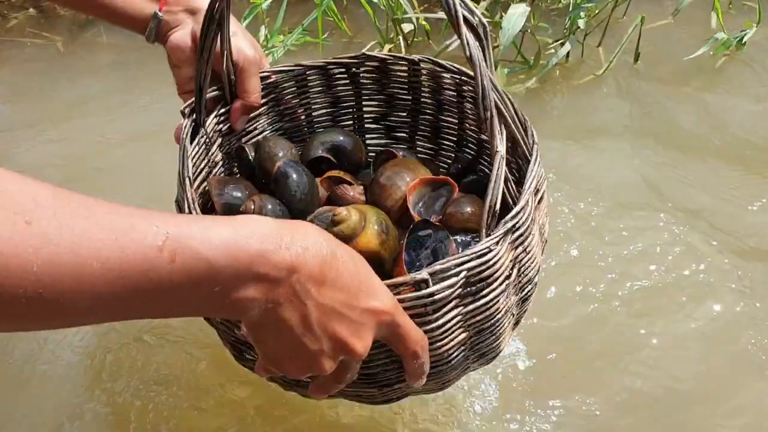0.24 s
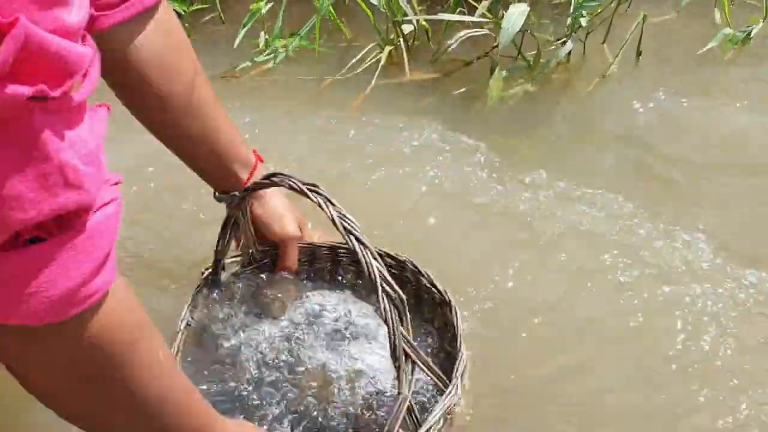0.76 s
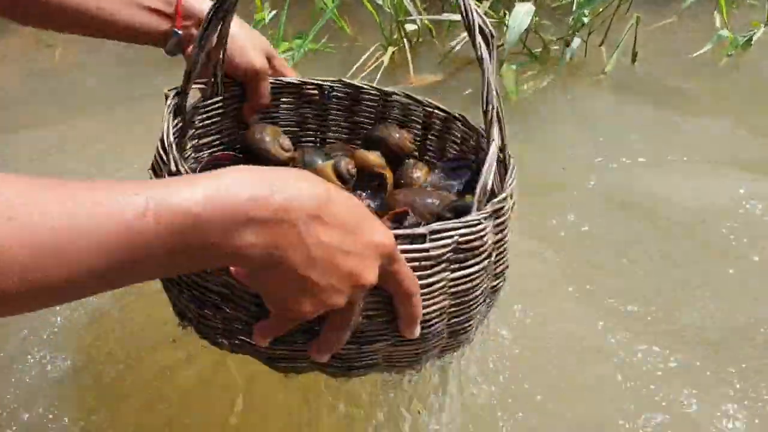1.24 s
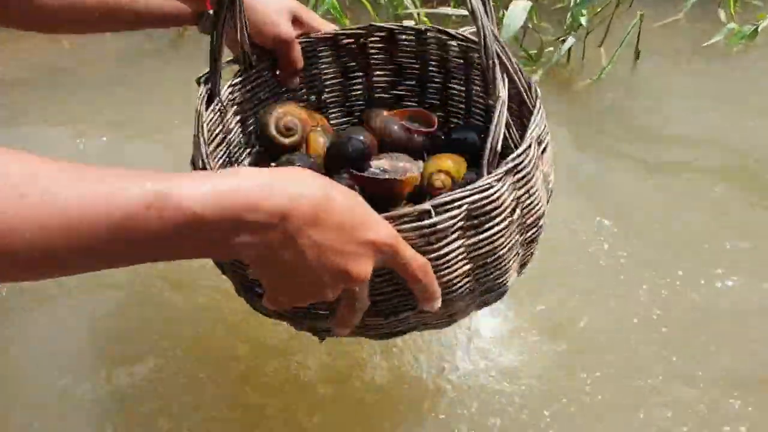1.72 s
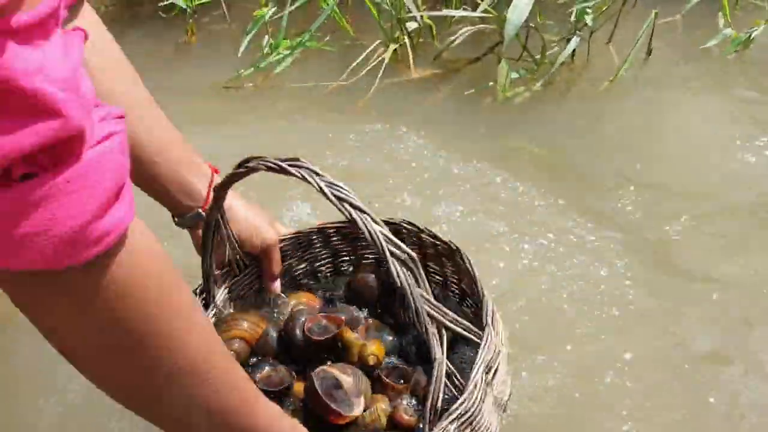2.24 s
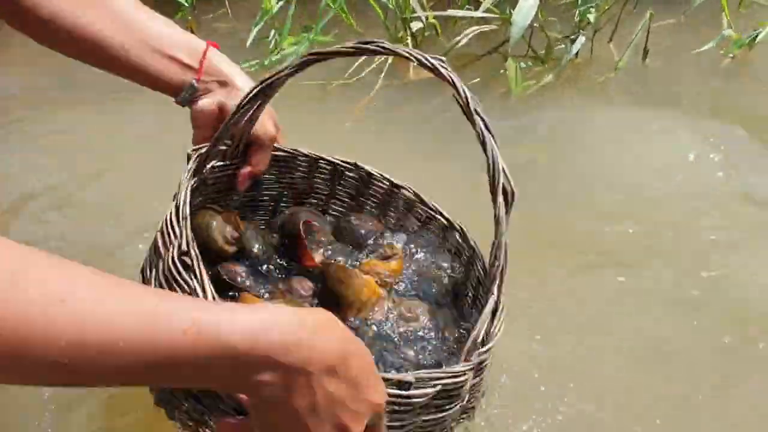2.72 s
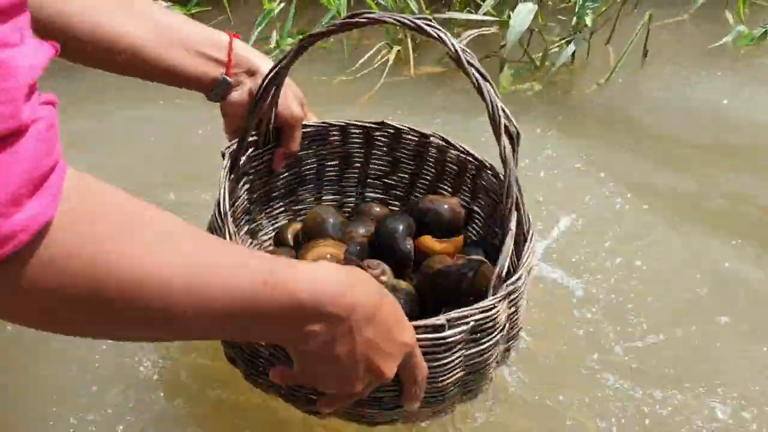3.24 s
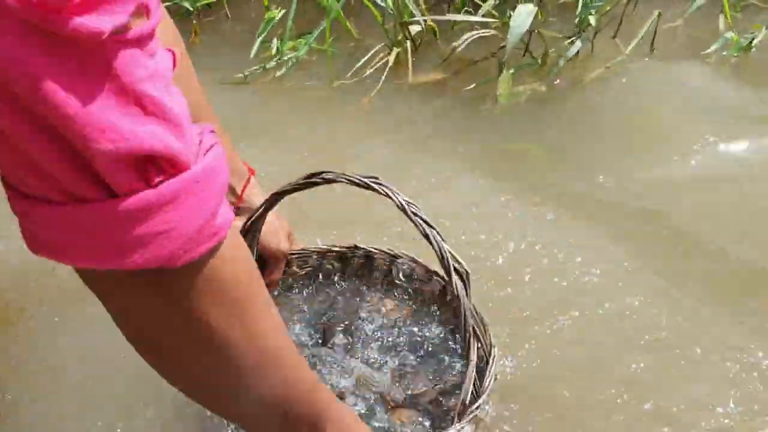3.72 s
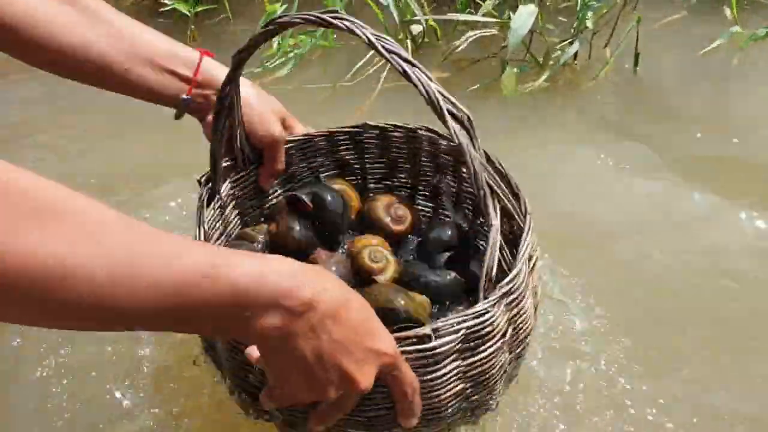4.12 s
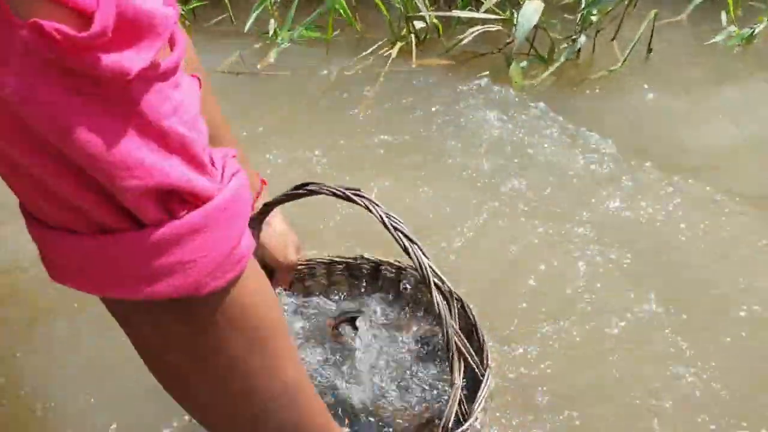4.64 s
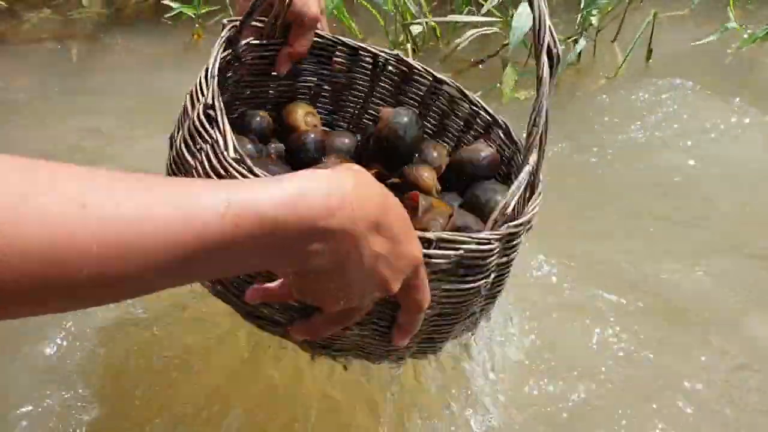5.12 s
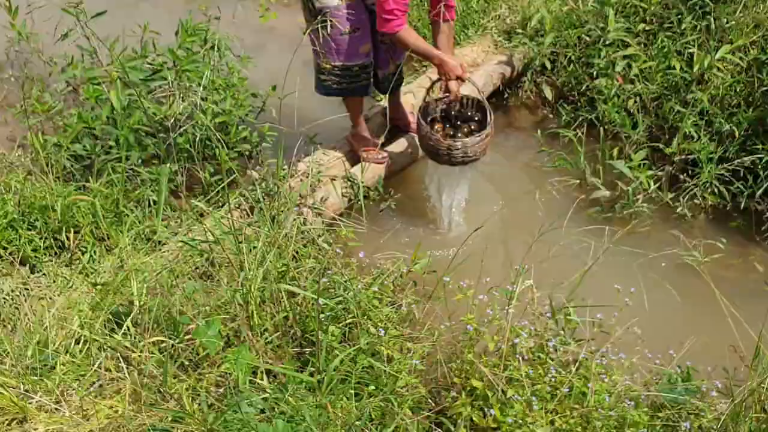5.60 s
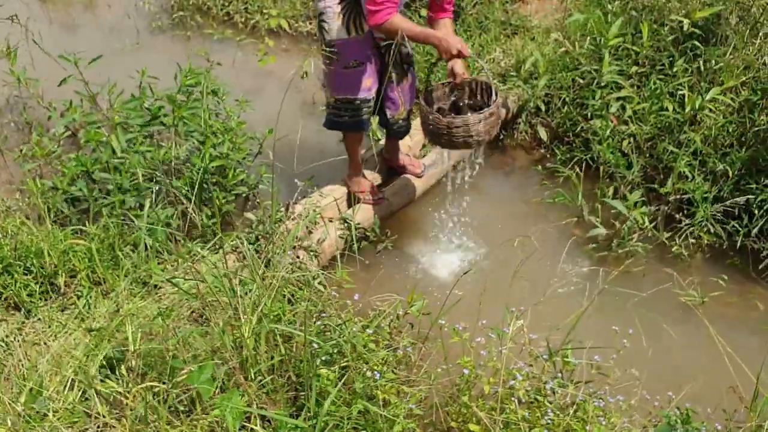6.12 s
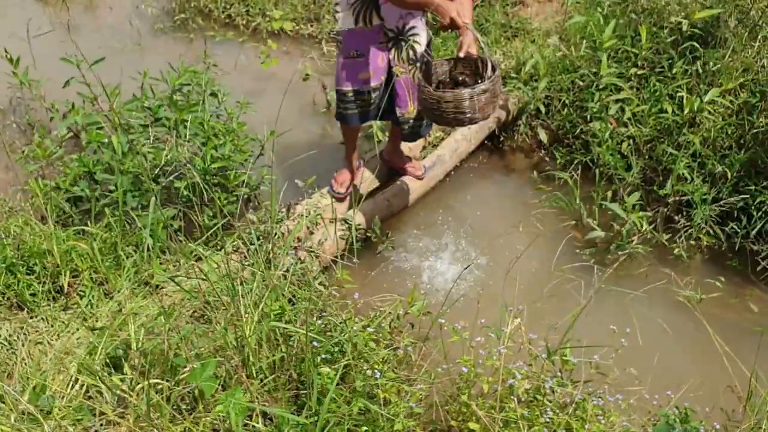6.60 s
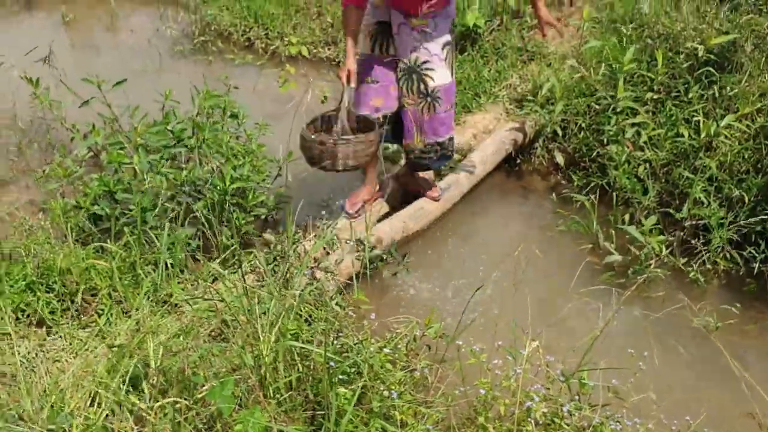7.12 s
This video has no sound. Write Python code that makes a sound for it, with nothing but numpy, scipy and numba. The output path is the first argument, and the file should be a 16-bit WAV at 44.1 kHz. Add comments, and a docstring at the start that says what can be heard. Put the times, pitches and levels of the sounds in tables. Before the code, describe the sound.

Close, dry outdoor stereo of a wicker basket of snails being rinsed in a shallow stream. From 0 to 0.35 s heavy splashes land in quick wet slaps with bubbly wash and spray. The flow drops to a thin trickle with tiny clicks, then submerged gurgles at about 0.8 and 1.05 s. At 1.6 s another strong double splash, with a bright plop, and a sharper slap around 2.0 s. A crisp shell clack at 2.2 s, soft low bubbling to 2.9 s, then rounder sloshing from 3.0 to 3.5 s. Gentler swishes, plops and clacks continue, swelling around 4.0 to 4.4 s, and quieten by 5.4 s. At 5.7 s a loud, hissy pour hits the water; smaller splashes at 6.0 and 6.3 s break into drips, fading to near silence with faint clicks after 6.8 s. Light wind rumbles and a barely audible stream lie beneath.

```python
"""A wicker basket of snails splashes in a shallow stream, is dunked and lifted again, then drains in drips.
Splashes and flow are swarms of decaying sines over filtered noise: bubbles, drops and spray, set by level curves.
Slaps and plops are single damped resonances with noise bursts, and clicks of shells and wicker
a few short modes with a crack, all at listed times.
Throughout, filtered noise gives a faint stream and a light breeze that gusts on the microphone."""
import sys
import numpy as np
from scipy import signal
from scipy.fft import rfft, irfft, next_fast_len
from scipy.io import wavfile
from scipy.ndimage import uniform_filter1d
from numba import njit

SR = 44100
rng = np.random.default_rng(int(sys.argv[2]) if len(sys.argv) > 2 else 0)


def store_wav(level_fs):
    """Save 16-bit WAV to argv[1]."""
    pcm = np.round(np.clip(np.atleast_2d(level_fs), -1, 1) * 32767)
    wavfile.write(sys.argv[1], SR, pcm.T.astype(np.int16))


N = 324557
TIME = np.arange(N) / SR   # seconds

# Table levels are relative; each source adds its own trim.
# water thrown up or pouring out of the basket: crest_s, bubbles_db, swell_s, ebb_s,
# drops_over_bubbles_db, spray_over_drops_db
SPLASHES = [(0.023, -30, 0.05, 0.018, 7, -0.5), (0.087, -18, 0.081, 0.13, 6, -5),
            (0.121, -16, 0.055, 0.07, -19, -3), (0.216, -17.5, 0.11, 0.055, -1.5, -2.5),
            (0.28, -31.5, 0.08, 0.088, -0.5, -3), (0.395, -33, 0.25, 0.074, 2, -3.5),
            (0.889, -38, 0.014, 0.043, -19.5, 10.5), (1.081, -32, 0.04, 0.06, -16, -5),
            (1.531, -34.5, 0.039, 0.027, 4.5, 0.5), (1.627, -18.5, 0.063, 0.16, 2.5, -2),
            (1.682, -17.5, 0.13, 0.074, -4, -5.5), (1.906, -49.5, 0.034, 0.05, 19, -10),
            (1.967, -20, 0.029, 0.11, 2.5, -1), (2.028, -29.5, 0.04, 0.24, 2.5, -0.5),
            (2.74, -32.5, 0.033, 0.075, -17.5, -5), (3.024, -26, 0.17, 0.14, -0.5, -9),
            (3.149, -27.5, 0.039, 0.53, -3, -5), (3.26, -23.5, 0.24, 0.17, 1, -1.5),
            (3.426, -25, 0.22, 0.048, -1.5, -5), (3.512, -37, 0.03, 0.025, 4, -10.5),
            (3.603, -36.5, 0.096, 0.12, 0, -2.5), (4.128, -25, 0.28, 0.18, -6.5, -9.5),
            (4.265, -25.5, 0.18, 0.089, 1.5, -11.5), (4.621, -35, 0.036, 0.077, -4, 0),
            (5.18, -49, 0.29, 0.26, -4, 6), (5.6, -34.5, 0.19, 0.15, 3, 1),
            (5.664, -25.5, 0.072, 0.12, 3.5, 5), (5.697, -14.5, 0.05, 0.099, -0.5, -3.5),
            (5.784, -27, 0.088, 0.031, 3, -6.5), (5.921, -36.5, 0.1, 0.25, 6, -7),
            (6.026, -28.5, 0.02, 0.0096, 4.5, 0.5), (6.325, -27, 0.0069, 0.097, 8, -5),
            (6.376, -40, 0.033, 0.044, 14, -2.5), (6.445, -52, 0.04, 0.08, 18.5, -7.5),
            (6.535, -34, 0.092, 0.06, 10, -4.5)]
# steady flow through the weave between the splashes: time_s, level_db
FLOW = [(0.0, -29), (0.45, -44), (0.66, -46), (0.75, -43.5), (0.84, -51.5), (0.93, -43), (1.1, -44.5),
        (1.3, -50.5), (1.47, -45.5), (1.87, -58), (2.2, -48), (2.53, -43), (2.83, -41), (2.93, -33.5),
        (3.85, -44.5), (4.38, -34.5), (4.88, -47.5), (5.08, -38.5), (5.42, -51), (5.98, -42), (6.29, -48),
        (6.68, -46.5), (7.02, -55.5), (7.12, -67.5), (7.23, -54)]
# the basket goes under: deepest_s, half_length_s, depth (0-1)
DUNKS = [(0.835, 0.084, 0.46), (1.034, 0.08, 1.0), (2.584, 0.29, 0.61), (3.82, 0.22, 0.57),
         (4.797, 0.38, 0.39)]
# sheets of water hitting the stream: start_s, level_db, cavity_pitch_hz, t60_s
SLAPS = [(0.05, -19, 2260, 0.064), (0.078, -1, 1110, 0.059), (0.116, 0, 1086, 0.054),
         (0.206, -3.5, 1180, 0.076), (1.589, 1.5, 2140, 0.04), (1.609, -3.5, 1160, 0.12),
         (1.943, -6.5, 1570, 0.035), (1.961, -16, 1900, 0.07), (1.996, -6, 2190, 0.16),
         (2.022, 1.5, 1027, 0.048), (3.012, -11, 1225, 0.1), (3.262, -4.5, 615, 0.09),
         (5.595, -7.5, 2380, 0.13), (5.66, 4, 2602, 0.091), (5.69, -1.5, 1040, 0.06),
         (6.018, -7, 934, 0.055), (6.32, -9, 1340, 0.053)]
# single large bubbles: start_s, level_db, pitch_hz
PLOPS = [(0.88, -29, 1120), (1.032, -31, 610), (1.05, -26, 644), (1.076, -24, 625), (1.566, -20, 2190),
         (1.586, -5.5, 2220), (1.768, -15.5, 2100), (2.415, -27.5, 1210), (2.479, -31.5, 517),
         (2.626, -28.5, 1250), (2.733, -29, 1130), (2.767, -23, 1090), (2.866, -19.5, 1025),
         (3.501, -22.5, 1070), (3.558, -23, 1130), (3.994, -14.5, 1360), (4.007, -18, 1100),
         (4.544, -25.5, 628), (4.666, -25, 281), (4.707, -28, 1180), (5.017, -26, 1090)]
# shells knocking together and wicker snapping: start_s, level_db, pitch_hz
CLACKS = [(0.54, -24.5, 11500), (0.564, -31, 7000), (0.67, -35, 12000), (0.7126, -24.5, 4080),
          (1.2052, -27.5, 1260), (1.8121, -27.5, 1520), (2.148, -25.5, 1640), (2.174, -12.5, 6400),
          (2.274, -30.5, 2900), (2.8654, -36, 1220), (2.9874, -18.5, 3070), (3.0125, -19.5, 2920),
          (3.503, -35, 1810), (3.5599, -23.5, 1310), (3.6406, -29.5, 2360), (3.7192, -32, 1180),
          (3.992, -38, 1390), (4.4578, -16.5, 2960), (4.581, -22, 2700), (4.968, -31, 1140),
          (5.065, -29, 1920), (6.2687, -34, 2120), (6.8322, -43, 1580), (6.8824, -39, 2350),
          (6.9, -34, 2800), (7.2048, -38.5, 3800), (7.243, -37, 5630), (7.297, -42, 2160)]
# modes of one clack: multiple_of_pitch (ratio), level_db
CLACK_MODES = [(1, 5), (1.17, -4), (1.9, -5.5)]
# filter responses of the water sounds, of the stream and of the other sources: frequency_hz, gain_db
BUBBLE_COLOUR = [(60, -53), (140, -11.5), (320, -13), (420, -3.5), (560, 0.5), (830, -1), (1170, 4),
                 (1500, -2), (2000, -5.5), (3500, -47)]
DROP_COLOUR = [(200, -46), (900, -18), (1400, -3), (1750, -.5), (2200, .5), (2900, -4), (3800, -11),
               (5000, -15), (9000, -48)]
SPRAY_COLOUR = [(800, -50.5), (2800, 2.5), (4100, 0), (5200, -1), (6700, -1.5), (7500, -4.5), (8500, -11),
                (10700, -8), (13500, -9), (16000, -12.5)]
SLAP_COLOUR = [(47, -42), (80, -45.5), (346, -31), (538, -27), (839, -2), (1090, -44), (2080, -11),
               (2900, 2), (4620, -16), (6170, -5.5), (8410, -47.5), (10500, -14), (16000, -30)]
STREAM_COLOUR = [(24, -28), (40, -11), (444, -4.5), (516, 2.5), (2380, -31), (5580, -15), (6490, -15),
                 (7730, -9), (12500, -8), (16000, -21)]
PLUNGE_COLOUR = [(50, -20.5), (160, -1.5), (330, 1.0), (520, 0), (900, -7.0), (3000, -38)]
CRACK_COLOUR = [(150, -22), (700, -8), (2500, -5.0), (6500, -3.5), (9000, -13), (16000, -16.5)]
BANK_COLOUR = [(200, -22), (700, 3.5), (1800, 4.5), (12000, -0.5)]
EDDY_COLOUR = [(20, -29), (50, -1.0), (100, -1), (160, -9.0), (280, -14.5), (600, -39), (2000, -64.5)]
# left-right correlation of diffuse sound: frequency_hz, likeness (-1 to 1)
LIKENESS = [(60, 0.79), (150, 0.93), (300, 0.77), (600, 0.9), (1200, 0.27), (2500, 0.24), (5000, 0.83),
            (12000, 0.36)]
# bearing of the basket: time_s, left_channel_lead_ms
BEARING = [(0, 0.043), (5.4, 0.04), (6, -0.029)]
# gusts on the microphone: peak_s, level_db, half_length_s
GUSTS = [(0.754, -35, 0.077), (0.93, -37.5, 0.049), (1.094, -40.5, 0.072), (1.347, -32.5, 0.11),
         (1.637, -36.5, 0.15), (2.0, -50, 0.12), (2.197, -41.5, 0.033), (3.984, -46, 0.019),
         (4.4, -29, 0.062), (4.674, -35.5, 0.067), (4.88, -41, 0.09), (5.094, -41, 0.064),
         (5.246, -51, 0.06), (6.105, -44, 0.036), (6.6, -58, 0.076)]
# light air between the gusts: time_s, level_db
AIR = [(0.0, -53), (2.5, -63), (3.4, -54), (5.45, -60), (6.65, -52.5), (6.78, -68), (7.14, -73.5),
       (7.3, -56)]

SWELL_RANGE_DB, CREST_S = 22, 0.0047   # fall over one swell or ebb time; hold either side of the crest
FLOW_DROPS_DB, FLOW_SPRAY_DB = -1.5, -3   # against the flow curve, basket at the surface
SUNK_DROPS_DB, SUNK_SPRAY_DB = -20.5, -12.5   # change at full depth, where nothing falls through the air
SMALL_LARGE_SPLIT_HZ = 580
SMALL_BUBBLES_DB, SUNK_SMALL_BUBBLES_DB = 4, -25.5   # small over large at the surface; change at full depth
HEAVY_FROM_DB, HEAVY_COARSENING = -27.5, 0.8   # above this level, dB lost by small bubbles per dB
DRIPS_FROM_S, DRIPS_ONSET_S = 6.25, 0.32   # the outflow breaks up into drips
DRIP_BUBBLES_DB, DRIP_SPRAY_DB = -9.5, 7   # change in the flow once it only drips
CUTOFF_HZ = 16200


def splash_levels():
    """Energy addition: splashes that swell, crest and ebb sum in power, as dB of bubbles, drops and spray."""
    power = np.full((3, N), 1e-12)
    for s, level_db, swell_s, ebb_s, drops_db, spray_db in SPLASHES:
        away = np.maximum((s - CREST_S - TIME) / swell_s, (TIME - s - CREST_S) / ebb_s)
        near = away < 4
        envelope_db = level_db - SWELL_RANGE_DB * np.maximum(away[near], 0)
        power[:, near] += from_db(envelope_db + [[0], [drops_db], [drops_db + spray_db]]) ** 2
    return 10 * np.log10(power)


def water_levels():
    """Source balance: depth lowers the flow's drops and spray and small bubbles; draining trades bubbles for spray."""
    flow_db, = in_time(FLOW)
    depth = sum(deepest * humps(s, half_length_s) for s, half_length_s, deepest in DUNKS)
    dripping = np.clip((TIME - DRIPS_FROM_S) / DRIPS_ONSET_S, 0, 1)
    splash_bubble_db, splash_drop_db, splash_spray_db = splash_levels()
    flow_drop_db = flow_db + FLOW_DROPS_DB + SUNK_DROPS_DB * depth
    flow_spray_db = flow_db + FLOW_SPRAY_DB + SUNK_SPRAY_DB * depth + DRIP_SPRAY_DB * dripping
    bubble_db = add_levels(splash_bubble_db, flow_db + DRIP_BUBBLES_DB * dripping)
    drop_db = add_levels(splash_drop_db, flow_drop_db)
    spray_db = add_levels(splash_spray_db, flow_spray_db)
    # heavier splashes make larger bubbles
    coarsening_db = HEAVY_COARSENING * np.maximum(bubble_db - HEAVY_FROM_DB, 0)
    fine_db = SMALL_BUBBLES_DB + SUNK_SMALL_BUBBLES_DB * depth - coarsening_db
    return bubble_db, drop_db, spray_db, fine_db


def bubbles(level_db, fine_db):
    """Volume resonance: trapped air rings with a rising pitch; in calmer water longer singers stand out."""
    grains = swarm(level_db, per_s=2400, low_hz=258.2, high_hz=1938, cycles=19.3, rise=0.26,
                   spread_db=4.0, lag_spread_ms=0.1, thinning=.45, count=30000)
    singers = swarm(level_db, per_s=60, low_hz=433.5, high_hz=1454, cycles=37.6, rise=0.5,
                    spread_db=4.5, lag_spread_ms=.05, thinning=0.045, count=1500)
    wash = from_db(-4) * diffuse_noise()
    churn = colour(grains + wash, BUBBLE_COLOUR)
    low_pass = signal.butter(2, SMALL_LARGE_SPLIT_HZ, fs=SR, output="sos")
    large = signal.sosfiltfilt(low_pass, churn)
    small = churn - large
    churn = even(large + from_db(fine_db) * small, window_s=0.025)
    exposed_db = -.25 * (level_db - level_db.max()) - 12
    return from_db(level_db - 0.5) * (churn + from_db(exposed_db) * singers)


def drops(level_db):
    """Impact and entrainment: drops tick and leave small ringing bubbles; some land alone with a clear plink."""
    grains = swarm(level_db, per_s=4000, low_hz=1203, high_hz=4470, cycles=39, rise=0.1,
                   spread_db=5.5, lag_spread_ms=0.075, thinning=0.37, count=40000)
    plinks = swarm(level_db, per_s=27, low_hz=1622, high_hz=4200, cycles=47, rise=0.15,
                   spread_db=7.0, lag_spread_ms=0.017, thinning=0.039, count=1500)
    wash = from_db(-5) * diffuse_noise()
    patter = even(colour(grains + wash, DROP_COLOUR), window_s=0.08)
    return from_db(level_db - 1.1) * (patter + from_db(-13) * plinks)


def spray(level_db):
    """Superposition of many impacts: fine droplets crackle in showers and blur into hiss, with tiny bubbles."""
    grains = swarm(level_db, per_s=8500, low_hz=3270, high_hz=12720, cycles=11.5, rise=0.062,
                   spread_db=2.5, lag_spread_ms=0.052, thinning=0.34, count=60000)
    sparkle = swarm(level_db, per_s=83, low_hz=4030, high_hz=7380, cycles=72, rise=0.041,
                    spread_db=10.0, lag_spread_ms=0.037, thinning=0.06, count=1500)
    hiss = from_db(-1.0) * diffuse_noise()
    fizz = even(colour(grains + hiss, SPRAY_COLOUR), window_s=0.041)
    showers = gobs(per_s=64, t60=0.072, share=0.68)
    return from_db(level_db - 0.37) * (fizz * showers + from_db(-9) * sparkle)


def plunge(level_db):
    """Cavity resonance: a heavy fall of water opens large, low-pitched cavities, favoured by high level."""
    grains = swarm(level_db, per_s=1200, low_hz=134.6, high_hz=546, cycles=11.0, rise=0.24,
                   spread_db=5.0, lag_spread_ms=.05, thinning=0.51, count=6000)
    depth_db = level_db - 17.5 + 0.18 * (level_db - level_db.max())
    return from_db(depth_db) * even(colour(grains, PLUNGE_COLOUR), window_s=0.018)


def slaps():
    """Impulsive excitation: a sheet of water smacks the surface and the cavity under it rings."""
    s, level_db, hz, t60 = np.transpose(SLAPS)
    t60 = np.clip(t60, .01, .3)
    smack = colour(bursts(s, level_db - 6.0, t60), SLAP_COLOUR)
    heights = from_db(level_db - 12.5)
    ring = placed(s, heights, hz, t60 * 0.96, rise=0.33, width_db=1.5, lag_spread_ms=.04)
    return smack + ring


def plops():
    """Bubble resonance: big air pockets break loose; larger ones ring lower and longer, and all glide up."""
    s, level_db, hz = np.transpose(PLOPS)
    t60 = 0.039 * np.sqrt(1000 / hz)
    ring = placed(s, from_db(level_db - 1), hz, t60, rise=.4, width_db=1.5, lag_spread_ms=.03)
    return ring + colour(bursts(s, level_db, t60 * 0.65), BUBBLE_COLOUR)


def clacks():
    """Modal vibration: wet shells and wicker give a dry crack and a few very short modes."""
    s, level_db, hz = np.transpose(CLACKS)
    ring = sum(placed(s, from_db(level_db + db), hz * ratio, 24 / hz, rise=0, width_db=0.5, lag_spread_ms=0.012)
               for ratio, db in CLACK_MODES)
    crack = bursts(s, level_db + 0.5, np.full(len(s), .014))
    return ring + colour(crack, CRACK_COLOUR)


def banks(x, wet_db, t60):
    """Diffuse reflection: a faint decaying scatter from the basket, the water surface and the grassy banks."""
    age = TIME[:SR // 4]
    decay = np.exp(-np.log(1000) * age / t60)
    scatter = rng.standard_normal((2, len(age))) * decay * (age > .002)
    scatter /= np.sqrt(np.sum(scatter ** 2, axis=1, keepdims=True))   # unit energy per channel
    tail = signal.oaconvolve(x, scatter, axes=1)[:, :N]
    return x + from_db(wet_db) * colour(tail, BANK_COLOUR)


def stream_murmur():
    """Stationary broadband noise: the stream murmurs at one faint level."""
    return from_db(-64.0) * rms_one(colour(diffuse_noise(), STREAM_COLOUR))


def breeze():
    """Turbulent pressure: lumpy low-frequency noise on the microphone ports, largely its own on each side."""
    air_db, = in_time(AIR)
    gust_power = sum(from_db(db) ** 2 * humps(s, half_length_s) for s, db, half_length_s in GUSTS)
    level_db = add_levels(air_db, 10 * np.log10(gust_power))
    opposed = from_db(-0.5) * rng.standard_normal(N) * [[1], [-1]]
    eddies = colour(diffuse_noise() + opposed, EDDY_COLOUR)
    return from_db(level_db - 3.0 + 4.1 * drift(28)) * even(eddies, window_s=0.11)


def swarm(level_db, per_s, low_hz, high_hz, cycles, rise, spread_db, lag_spread_ms, thinning, count):
    """Random point process: ringing grains crowd to per_s at the strongest flow and thin out as it eases."""
    when, luck, pitch, size, life, sign = rng.random((count, 6)).T
    when_s = when * N / SR
    crowding = from_db(thinning * (np.interp(when_s, TIME, level_db) - level_db.max()))
    born = luck < per_s * crowding * N / SR / count
    hz = low_hz * (high_hz / low_hz) ** pitch
    size_db = spread_db * np.minimum(-np.log(1 - size), 3)
    heights = np.sign(sign - .5) * from_db(size_db) * hz / high_hz
    t60 = cycles * 2 ** (2 * life - 1) / hz   # from half to twice the given cycles
    return rms_one(placed(when_s[born], heights[born], hz[born], t60[born], rise,
                          width_db=3.0, lag_spread_ms=lag_spread_ms))


def placed(starts, heights, hz, t60, rise, width_db, lag_spread_ms):
    """Directional cues: a ring has a random level and time difference between the channels."""
    size = 4096
    pan, lag = rng.standard_normal((2, size))[:, (starts * SR).astype(int) % size]
    lag_s = lag * lag_spread_ms / 1000
    hz, t60 = np.ascontiguousarray(hz), np.ascontiguousarray(t60)
    return np.array([rings(starts + side * lag_s / 2, heights * from_db(side * pan * width_db / 2),
                           hz, t60, float(rise)) for side in (1, -1)])


@njit
def rings(starts, heights, hz, t60, rise):
    """Damped oscillation: a sum of dying sines, each gliding up by the share `rise` over its t60."""
    out = np.zeros(N)
    for k in range(len(starts)):
        first, life = max(int(starts[k] * SR) + 1, 0), t60[k] * SR
        turn = 2 * np.pi * hz[k] / SR   # radians per sample
        step = np.exp(1j * turn - np.log(1000) / life)
        glide = np.exp(1j * turn * rise / life)
        wave = heights[k] * np.exp(1j * turn * (first - starts[k] * SR))
        for i in range(first, min(first + int(life), N)):
            out[i] += wave.imag
            wave, step = wave * step, step * glide
    return out


def bursts(starts, levels_db, t60s):
    """Impulsive noise: for every blow it starts at once and decays exponentially."""
    envelope = np.zeros(N)
    for s, level_db, t60 in zip(starts, levels_db, t60s):
        first = int(s * SR)
        age = TIME[:min(int(t60 * SR), N - first)]
        envelope[first:][:len(age)] += from_db(level_db) * np.exp(-np.log(1000) * age / t60)
    return envelope * diffuse_noise()


def gobs(per_s, t60, share):
    """Shot noise: gain of water landing in lumps that start at once and decay, carrying `share` of the power."""
    hits = (rng.random(N) < per_s / SR) * rng.exponential(1, N)
    power = signal.lfilter([1], [1, -from_db(-60 / (t60 * SR)) ** 2], hits + 1e-12)
    share = np.clip(share, 0, .9)
    return np.sqrt(1 - share + share * power / power.mean())


def diffuse_noise():
    """Partial coherence: white stereo noise whose channels correlate as LIKENESS says at each frequency."""
    size = next_fast_len(N, True)
    alike = np.clip(at_hz(LIKENESS, np.fft.rfftfreq(size, 1 / SR)), -1, 1)
    mid, side = rfft(rng.standard_normal((2, size)))
    spectra = np.sqrt(1 + alike) * mid + np.sqrt(1 - alike) * side * [[1], [-1]]
    return rms_one(irfft(spectra, size)[:, :N])


def colour(x, spectrum):
    """Minimum-phase filtering: the folded cepstrum gives a causal response with the given spectrum."""
    size = 4096
    cepstrum = irfft(np.log(from_db(at_hz(spectrum, np.fft.rfftfreq(size, 1 / SR)))))
    cepstrum[1:size // 2] *= 2
    cepstrum[size // 2 + 1:] = 0
    response = irfft(np.exp(rfft(cepstrum)))
    return signal.oaconvolve(x, response[None], axes=1)[:, :N]


def even(x, window_s):
    """Power normalization: hold the power near 1 over the window; faster grain stays."""
    size = max(int(window_s * SR), 8)
    power = uniform_filter1d(uniform_filter1d(np.mean(x ** 2, axis=0), size), size)
    return x / np.sqrt(np.abs(power) + 1e-9)


def drift(rate_hz):
    """Low-passed noise: a random wander of unit rms, through two equal poles at rate_hz."""
    hop = 40   # samples between values
    r = np.exp(-2 * np.pi * hop * rate_hz / SR)
    slow = signal.lfilter([1], [1, -2 * r, r * r], rng.standard_normal(N // hop + 2002))[2000:]
    return np.interp(np.arange(N) / hop, np.arange(len(slow)), rms_one(slow))


def humps(s, half_length_s):
    """Gaussian envelope: a smooth rise and fall around a moment, of height 1."""
    return np.exp(-np.minimum(((TIME - s) / half_length_s) ** 2, 40))


def add_levels(*levels_db):
    """Incoherent addition: level of unrelated sounds heard together."""
    return 10 * np.log10(sum(from_db(level_db) ** 2 for level_db in levels_db))


def in_time(rows):
    """Linear interpolation: each column of a curve at every sample."""
    s, *columns = np.transpose(rows)
    return [np.interp(TIME, s, c) for c in columns]


def at_hz(points, hz):
    """Logarithmic frequency scale: interpolate a spectrum along it."""
    knots, values = np.transpose(points)
    return np.interp(np.log(hz + 1), np.log(knots), values)


def from_db(db):
    """Decibel law: level to amplitude gain."""
    return 10 ** (np.asarray(db) / 20)


def rms_one(x):
    """Mean-square normalization: scale to unit power."""
    return x / np.sqrt(np.mean(x ** 2) + 1e-20)


def scene():
    """Superposition: water surging in gobs, slaps, plops and clacks, over the stream and the breeze."""
    bubble_db, drop_db, spray_db, fine_db = water_levels()
    water = plunge(bubble_db) + bubbles(bubble_db - .3, fine_db) + drops(drop_db - .6) + spray(spray_db - .3)
    surge = gobs(per_s=60, t60=.06, share=.15)
    basket = banks(water * surge + slaps() + plops() + clacks(), wet_db=-15.5, t60=0.14)
    lead_ms, = in_time(BEARING)
    right = np.interp(TIME - lead_ms / 1000, TIME, basket[1])
    left_db = 0.78   # left is raised and right lowered by this much
    return np.array([basket[0], right]) * from_db([[left_db], [-left_db]]) + stream_murmur() + breeze()


def record(dry):
    """Saturation and band limiting: peaks are rounded, then a steep low-pass cuts the top."""
    rounded = 1.3 * np.tanh(dry / 1.3)
    return signal.sosfilt(signal.ellip(10, .1, 80, CUTOFF_HZ, fs=SR, output="sos"), rounded)


dry = scene()
out = record(dry)
store_wav(out)
```